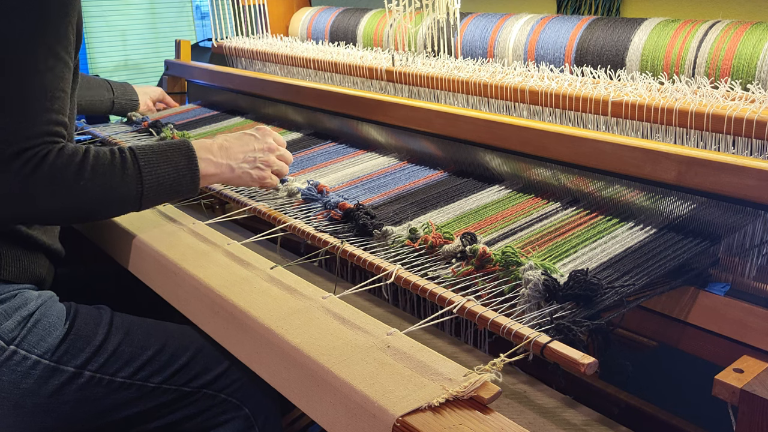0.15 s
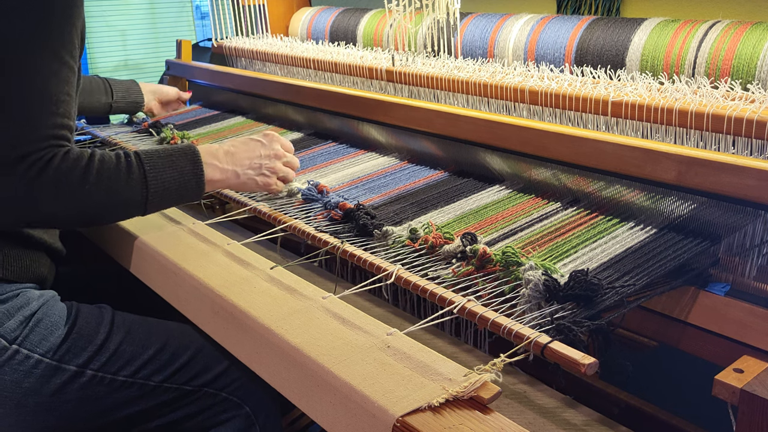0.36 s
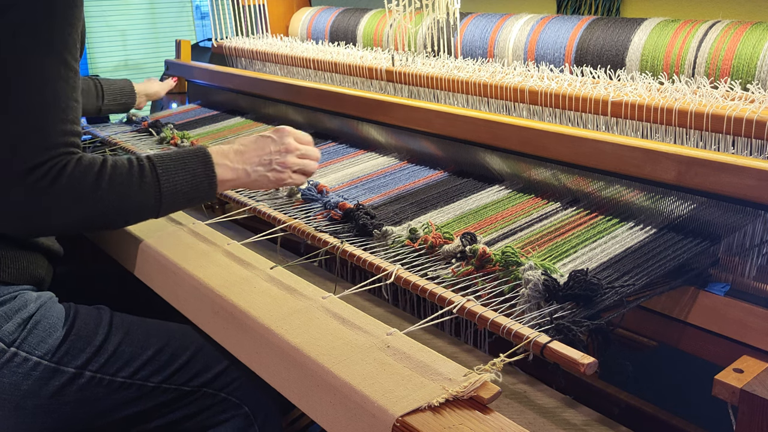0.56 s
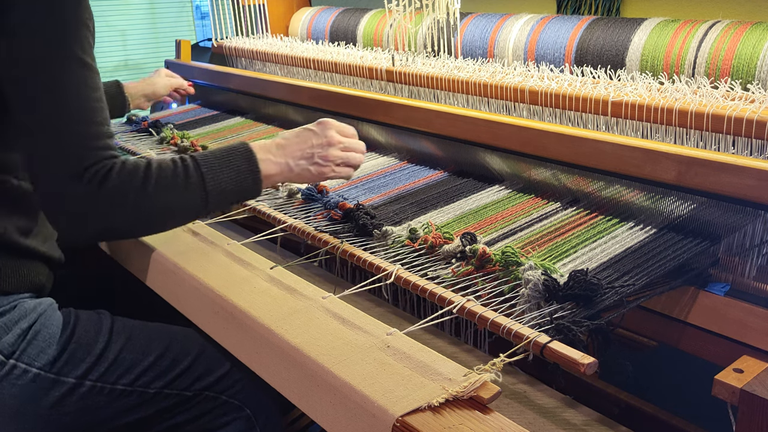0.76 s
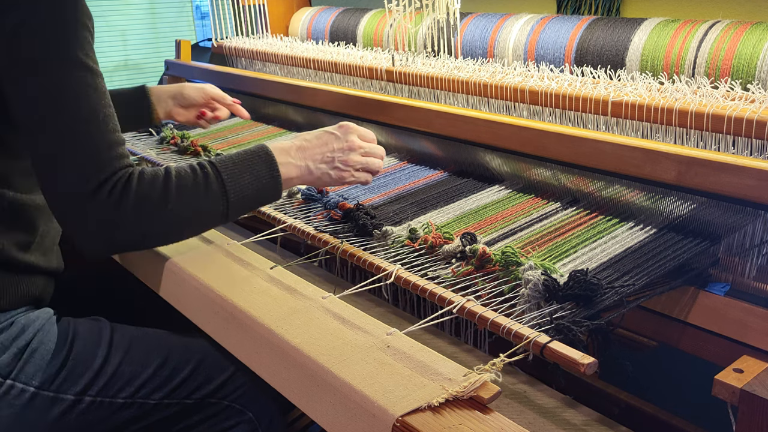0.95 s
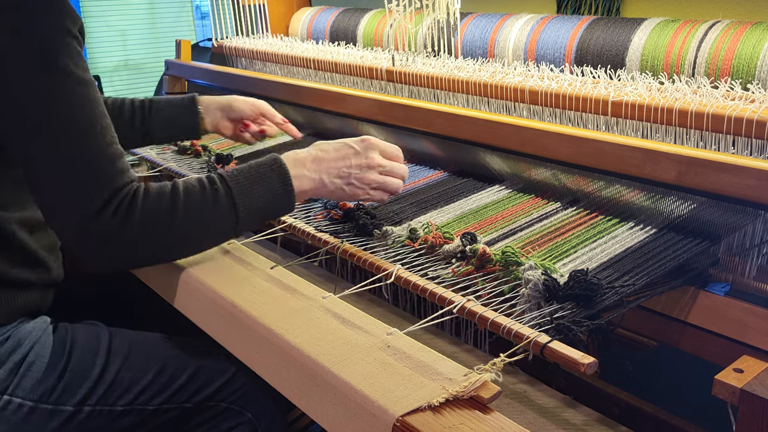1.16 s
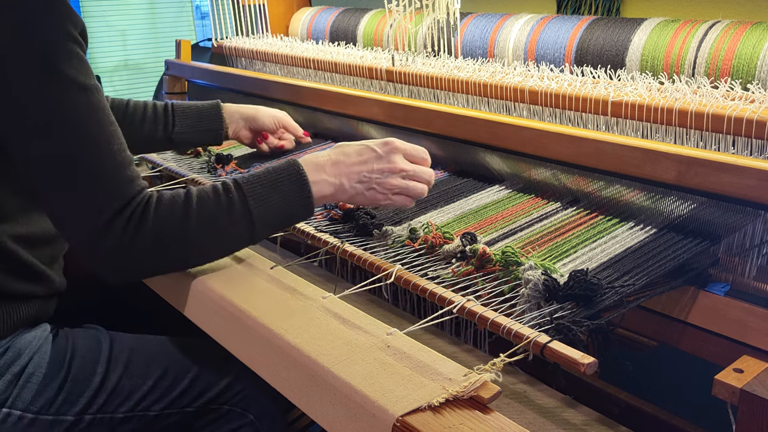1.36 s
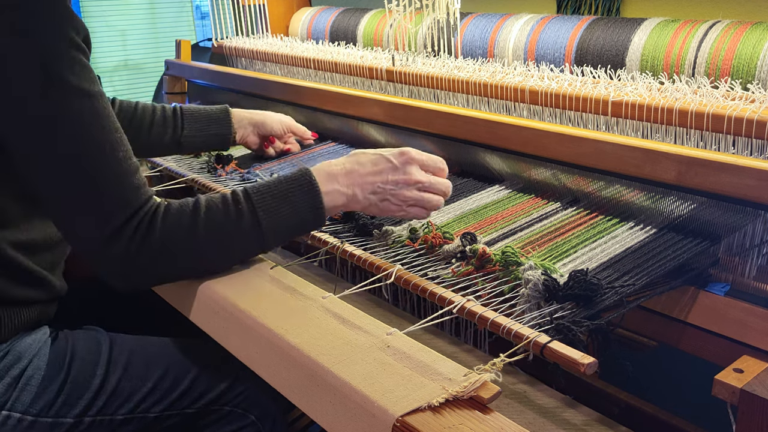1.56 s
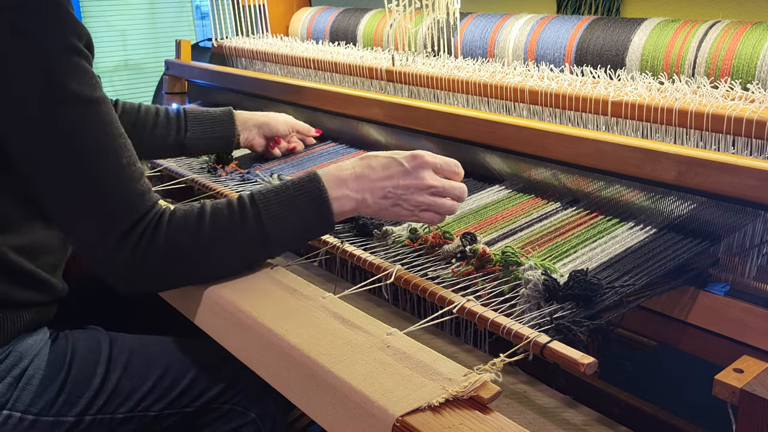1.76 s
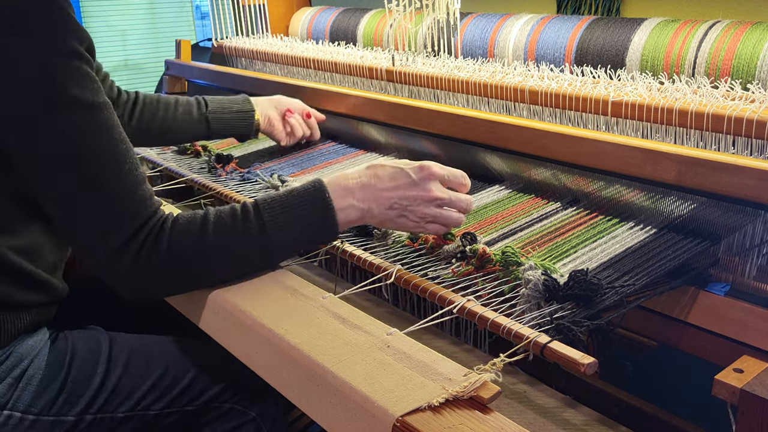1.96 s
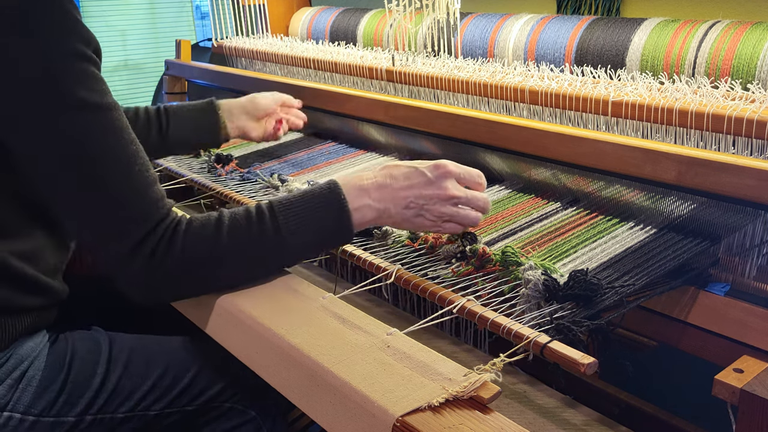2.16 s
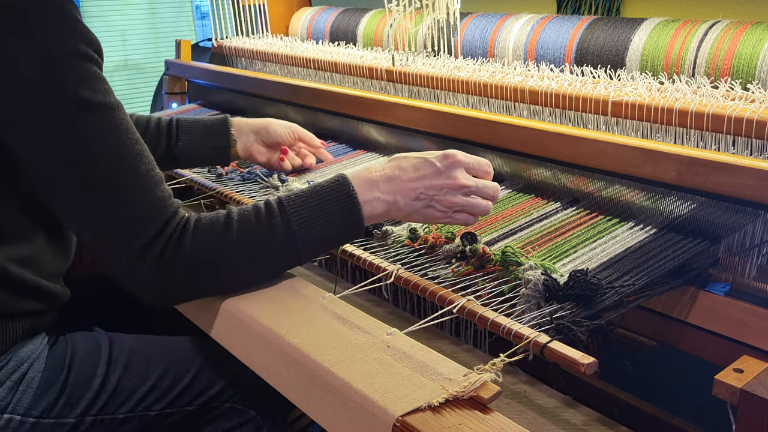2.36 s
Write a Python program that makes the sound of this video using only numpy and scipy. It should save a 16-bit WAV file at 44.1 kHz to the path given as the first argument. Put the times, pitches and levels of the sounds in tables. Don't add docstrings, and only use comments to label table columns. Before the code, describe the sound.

A floor loom changes its shed in a quiet, lightly reverberant room, heard close in stereo. At 0.34 s heddles jingle brightly with wooden knocks, then a harder steel clack lands at 0.52 s and fading ticks follow until about 1 s. A dull heel thump and soft sleeve rustle come near 1.1 s. After a lull, sharp double clacks at 1.88 and 1.95 s rattle out over a low floor thud.

```python
import sys
import numpy as np
from scipy import signal
from scipy.fft import rfft, irfft
from scipy.io import wavfile

SR = 44100
rng = np.random.default_rng(int(sys.argv[2]) if len(sys.argv) > 2 else 0)


def boost_factor(decibels):
    exponent = np.asarray(decibels, float) / 20
    return 10 ** exponent


def generate_wav(signal):
    frames = np.transpose(np.atleast_2d(signal))
    scaled = np.clip(frames, -1, 1) * 32767
    pcm = np.round(scaled).astype(np.int16)
    wavfile.write(sys.argv[1], SR, pcm)


N = 105751

# (frequency [Hz], level [dB], T60 [s])
BAR_MODES = [(1320, -13, .04), (1407, -1, .085), (1577, -6, .06), (1612, -2, .065), (1725, -7, .05),
             (1910, -8, .04), (2130, -7, .045), (2450, -9, .04)]
# (frequency [Hz], level [dB], T60 [s])
ROD_MODES = [(2565, -2, .045), (2890, -3, .045), (3105, -6, .045), (3360, -8, .04), (3890, -4, .04),
             (4550, -7, .04), (5290, -4, .045), (5650, -2, .04), (6050, -4, .035), (7640, -6, .035)]


def unit(x):
    return x / np.sqrt(np.mean(x ** 2) + 1e-20)


def along(points, hz):
    f, value = np.transpose(points)
    return np.interp(np.log(hz + 1), np.log(f + 1), value)


def noise(spectrum, count, alike):
    gain = boost_factor(along(spectrum, np.fft.rfftfreq(count, 1 / SR)))
    a, b = unit(irfft(rfft(rng.standard_normal((2, count))) * gain, count))
    turn = np.arccos(np.clip(alike, -1, 1)) / 2
    common, difference = np.cos(turn) * a, np.sin(turn) * b
    return np.array([common + difference, common - difference])


def ring(modes, rise_s, spread, count):
    scatter_db, detune = 2, 0.005
    t = np.arange(count) / SR
    hz, db, t60 = np.transpose(modes)[:, None, :, None]
    chance = rng.standard_normal((2, 2, len(modes), 1))
    level_db = db + scatter_db * (chance[0, :1] + 0.52 * spread * chance[0])
    gap = spread * np.sign(chance[1, :1]) * np.array([0.5, -0.5])[:, None, None]
    sines = np.sin(2 * np.pi * hz * (1 + detune * chance[1, 1:]) * t + gap)
    return (boost_factor(level_db - 60 * t / t60) * sines).sum(1) * (1 - np.exp(-t / rise_s))


def add(track, s, sound):
    start = round(s * SR)
    track[:, start:start + sound.shape[1]] += sound


def swells(rows, softness):
    t = np.arange(N) / SR
    total = np.zeros(N)
    for s, length_s, db in rows:
        phase = np.clip((t - s) / length_s, 0, 1)
        total += boost_factor(db) * np.abs(np.sin(np.pi * phase)) ** softness
    return total


def shafts():
    # (time [s], level [dB], heddles over bars [dB], chatter [s], suddenness [0-1])
    clacks = [(.343, -25, 4.5, 0.011, .6), (0.352, -32.5, 10, 0.014, 0.11), (.363, -31, 5, 0.0034, 0.5),
              (0.375, -28, 11, 0.0092, 0.4), (0.386, -29, 6.5, 0.0037, 0.7), (.396, -31.5, 9, 0.0043, 0.54),
              (0.409, -36.5, 2.5, 0.0048, 0.14), (0.431, -30.5, 10.5, 0.0094, 0.7),
              (0.449, -36, 9.5, 0.0094, .2), (0.522, -19.5, -10.5, 0.0048, 0.8),
              (.534, -24, -5.5, 0.0028, 0.8), (.544, -26.5, -4, .004, .5), (0.559, -34, -1.5, 0.0055, .3),
              (0.604, -37.5, 4.5, 0.009, 0.5), (0.619, -42, 11.5, 0.0085, .3),
              (.638, -42.5, 8.5, 0.0085, 0), (0.668, -37.5, 3.5, 0.0058, 0.3),
              (0.686, -37.5, 4.5, 0.0072, 0.3), (0.703, -38, 0, 0.0081, 0), (0.786, -46.5, 14, 0.0091, 0.4),
              (.84, -50, 3, 0.028, 0.32), (.89, -52, 4, 0.0037, 0.4), (0.904, -58, 7, .01, 0.4),
              (0.953, -57, -1, 0.0041, 0.08), (.96, -50, -4.5, 0.0095, 0.75),
              (0.996, -55, -13, 0.0088, 0.25), (1.876, -20.5, -2.5, 0.004, 0.8),
              (1.883, -24, 4, 0.0059, .6), (1.897, -29, 9, 0.0078, 0.7), (1.953, -23, 0.5, 0.0032, 1),
              (1.964, -26.5, 1.5, 0.0043, 0.4), (1.982, -34.5, 3, 0.0077, 0.4),
              (2.01, -30.5, 4, 0.0035, 0.1), (2.026, -32, 3, 0.0046, 0), (2.052, -31, 5.5, 0.0055, 0.6),
              (2.064, -34, -0.5, 0.0042, 0), (2.08, -38, -0.5, 0.0088, 0.4), (2.103, -49, -2, 0.0075, 0),
              (2.137, -46.5, -0.5, 0.0083, 0.21), (2.149, -46.5, 2.5, 0.0037, 1)]
    # (frequency [Hz], density [dB per Hz])
    heddles = [(900, -25), (1500, -3), (4700, -10), (5900, -5.5), (9600, -19.5), (10800, -32), (13000, -21),
               (15800, -45.5)]
    heddle_t60_s, contacts_per_s, contact_scatter_db = 0.031, 2800, 5.5
    swarm_db = np.array([[-26.0], [-16.5]])
    dull_above_hz, dull_db_per_db, hard_db = 8500, 0.74, -29.5
    side = np.array([[0.5], [-0.5]])
    bar_pan_db, heddle_pan_db, rods_db = 1.5, -3.5, -6.5

    out = np.zeros((2, N + SR))
    t = np.arange(SR // 4) / SR
    for s, db, bright_db, chatter_s, sudden in clacks:
        u = t[:SR // 8] / chatter_s
        hits = rng.random((2, len(u))) < contacts_per_s / SR
        contact_db = swarm_db + contact_scatter_db * rng.standard_normal(hits.shape)
        swarm = hits * boost_factor(contact_db) * (sudden + u) * np.exp(-u)
        swarm[:, 0] = sudden
        swarm = swarm / np.linalg.norm(swarm, axis=1, keepdims=True)

        dull_db = dull_db_per_db * (db + bright_db - hard_db)
        colour = [(hz, g + dull_db * (hz > dull_above_hz)) for hz, g in heddles]
        jingle = noise(colour, len(t), alike=0.063)
        jingle = jingle * boost_factor(-60 * t / heddle_t60_s) * (1 - np.exp(-t / 0.00031))
        jingle = jingle + boost_factor(rods_db) * ring(ROD_MODES, 0.0022, 0.47, len(t))
        jingle = boost_factor(bright_db + side * heddle_pan_db) * jingle
        bars = boost_factor(side * bar_pan_db) * ring(BAR_MODES, 0.0006, 1.54, len(t))

        clack = signal.fftconvolve(bars, swarm[:1], axes=1)
        clack = clack + signal.fftconvolve(jingle, swarm[1:], axes=1)
        add(out, s, boost_factor(db) * clack)
    return out[:, :N]


def taps():
    # (time [s], level [dB], frequency [Hz])
    rod_taps = [(0.346, -26, 5860), (0.431, -30, 5740), (0.444, -36, 2703), (0.529, -37, 5660),
                (.787, -41.5, 5350), (0.787, -46.5, 2830), (.889, -50, 5450), (0.96, -49.5, 2542),
                (0.961, -58, 5470), (2.14, -53, 5290), (1.877, -29, 7206), (1.878, -33, 3890),
                (1.898, -30, 5950), (1.882, -31, 2800), (2.013, -32, 5300), (2.031, -31.5, 5300),
                (0.609, -38.5, 2936), (.62, -36.5, 5240), (0.633, -44, 2580), (0.669, -40, 5350),
                (.689, -41, 5420), (0.687, -40, 2544), (0.792, -45.5, 2950), (.89, -55.5, 3840),
                (0.959, -58.5, 3906), (1.955, -34.5, 2150), (2.055, -36.5, 2662), (2.053, -37, 4475),
                (2.082, -39, 5310)]
    t60_s, split = 0.045, 0.022
    out = np.zeros((2, N + SR))
    for s, db, hz in rod_taps:
        t60 = t60_s * (3000 / hz) ** 0.5
        for delay_s, loss_db in [(0, 2), (0.005, -6)]:
            group = [(hz * (1 + k * split), -9 * abs(k), t60) for k in (-1, 0, 1)]
            add(out, s + delay_s, boost_factor(db + loss_db) * ring(group, 0.0007, 0.43, SR // 8))
    return out[:, :N]


def slides():
    # (landing [s], level [dB], growth [s])
    scrapes = [
        (0.029, -73, .03),
        (0.342, -45, 0.011),
        (1.875, -41.5, 0.01),
    ]
    t = np.arange(N) / SR
    rub = np.zeros(N)
    for s, db, grow_s in scrapes:
        rub += boost_factor(db) * (t < s) * np.exp(-np.abs(s - t) / grow_s)
    rub *= rng.standard_normal(N)
    body = ring(BAR_MODES, 0.001, 1.6, SR // 10)
    body = body + boost_factor(-12) * ring(ROD_MODES, 0.001, 1.6, SR // 10)
    return signal.fftconvolve(rub[None], body / np.linalg.norm(body[0]), axes=1)[:, :N]


def treadles():
    # (time [s], level [dB], pitch [Hz], T60 [s])
    knocks = [(.372, -25, 736, 0.041), (0.384, -37, 337.7, 0.12), (0.42, -35, 201, 0.082),
              (0.488, -32.5, 295, 0.058), (0.543, -48, 223, 0.3), (0.614, -58, 224, 0.19),
              (.56, -48, 648, 0.065), (.667, -42, 396, 0.049), (0.689, -42, 343.7, 0.055),
              (0.689, -45.5, 198, 0.11), (0.85, -44.5, 212, 0.061), (1.122, -46, 300, 0.053),
              (1.13, -44, 146.4, 0.068), (1.888, -51.5, 246.8, 0.097), (2.044, -41.5, 604, 0.029),
              (2.058, -41.5, 444, 0.066), (2.109, -46, 158, 0.084)]
    # (ratio to pitch [1], level [dB])
    wood = [(.55, -7.5), (.8, -6), (1, 0.5), (1.3, -2), (1.7, -6), (2.298, -13)]
    out = np.zeros((2, N + SR))
    for s, db, hz, t60 in knocks:
        for delay_s, loss_db in [(0, 5.5), (0.009, -10), (0.021, -6)]:
            parts = []
            for ratio, part_db in wood:
                part_hz = hz * ratio * boost_factor(0.46 * rng.standard_normal())
                parts.append((part_hz, part_db, 0.77 * t60 / ratio ** 0.12))
            add(out, s + delay_s, boost_factor(db + loss_db) * ring(parts, 0.0041, hz / 700, SR // 4))
    return out[:, :N]


def boards():
    # (time [s], level [dB], rise [s])
    thumps = [
        (0.398, -42, 0.024),
        (0.524, -37.5, 0.025),
        (0.67, -50, 0.0035),
        (0.962, -45.5, 0.059),
        (1.137, -38.5, .006),
        (1.155, -42, 0.0046),
        (1.93, -34.5, 0.071),
        (2.098, -46.5, 0.024),
        (2.198, -43.5, 0.034),
        (2.281, -51, 0.016),
    ]
    # (frequency [Hz], level [dB], T60 [s])
    floor = [(47.4, -6.5, 0.3), (58.96, 2, 0.25), (81.5, -13.5, 0.067), (96, -5.5, 0.22)]
    out = np.zeros((2, N + SR))
    for s, db, rise_s in thumps:
        add(out, s, boost_factor(db) * ring(floor, rise_s, 0.11, SR // 2))
    return out[:, :N]


def yarn():
    # (start [s], length [s], level [dB])
    swishes = [
        (1.08, 0.26, -64.5),
        (1.7, 0.38, -77.5),
        (2.15, 0.25, -69),
    ]
    # (frequency [Hz], density [dB per Hz])
    hiss_colour = [(900, -19), (2100, -2.5), (3900, -8.5), (6400, 1.5), (8800, -7.5), (11000, -11.5),
                   (13500, -6.5), (15800, -11.5)]
    # (start [s], length [s], level [dB])
    settling = [
        (1.78, 0.25, -71.5),
        (.36, 0.7, -59.5),
        (1.04, 0.094, -67),
        (1.12, 0.24, -66.5),
        (1.36, 0.15, -71),
        (1.86, 0.31, -63),
        (2.2, 0.2, -73.5),
    ]
    # (frequency [Hz], density [dB per Hz])
    frame_colour = [(53, -28.5), (90, -5.5), (113, -7), (421, -10.5), (457, -12), (635, -20.5),
                    (1500, -33.5), (1950, -64.5), (3300, -120)]
    hiss = swells(swishes, softness=0.65) * noise(hiss_colour, N, alike=0.1)
    rustle = swells(settling, softness=0.92) * noise(frame_colour, N, alike=1.0)

    brush_s, brush_db, brush_t60_s = 0.045, -69, 0.23
    brush_hz, width_hz = 7000, 1800
    t = np.arange(N) / SR
    band = [(brush_hz - width_hz, -30), (brush_hz, 0), (brush_hz + width_hz, -30)]
    brush = np.clip((t - brush_s) / 0.0044, 0, 1)
    brush = brush * boost_factor(brush_db - 60 * np.abs(t - brush_s) / brush_t60_s)
    return hiss + rustle + brush * noise(band, N, alike=0.71)


def room(x):
    # (frequency [Hz], T60 [s])
    decay = [(100, 0.17), (500, 0.27), (2000, 0.34), (6000, 0.28), (14000, 0.061)]
    wide_above_hz = 1500
    stretch = SR // 10
    sign = np.array([1, -1])[:, None, None]
    out = np.zeros((2, N + SR))
    for start in range(0, N, stretch):
        hz, t, z = signal.stft(rng.standard_normal((2, SR // 2)), SR, nperseg=256)
        width = (hz / (hz + wide_above_hz))[:, None]
        z = z[0] + sign * z[1] * width
        z = z * boost_factor(-60 * t / along(decay, hz)[:, None])
        tail = signal.istft(z, SR, nperseg=256)[1]
        tail = tail / np.linalg.norm(tail[0])
        wet = signal.fftconvolve(x[:, start:start + stretch], tail, axes=1)
        add(out, start / SR + 0.006, wet)
    return out[:, :N]


def background():
    # (frequency [Hz], density [dB per Hz])
    air = [(140, -6.5), (400, -11), (700, -20.5), (2000, -19.5), (4500, -22), (7200, -18.5), (9000, -25),
           (15800, -21)]
    # (frequency [Hz], density [dB per Hz])
    rumble = [(12, -47.5), (20, -24), (33, -7.5), (54, 5.5), (68, 0), (81, -19), (119, -11.5), (200, -32.5),
              (260, -56.5), (440, -120)]
    return boost_factor(-75) * noise(air, N, alike=0.1) + boost_factor(-65) * noise(rumble, N, alike=0.93)


def scene():
    steel = shafts() + slides() + taps()
    high = signal.butter(6, 1290, "high", fs=SR, output="sos")
    steel = boost_factor(-17) * steel + signal.sosfilt(high, steel)
    wood = treadles()
    steel_wet_db, wood_wet_db = -8.5, -1
    wet = room(boost_factor(steel_wet_db) * steel + boost_factor(wood_wet_db) * wood)
    return steel + wood + wet + boards() + yarn() + background()


def band_limit(x):
    return signal.sosfilt(signal.butter(12, 15810, fs=SR, output="sos"), x)


def record(dry):
    return band_limit(dry)


dry = scene()
out = record(dry)
generate_wav(out)
```